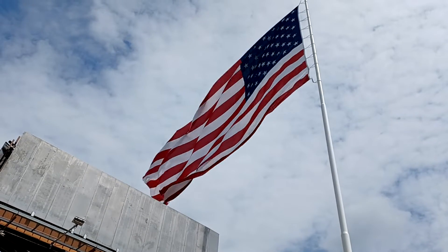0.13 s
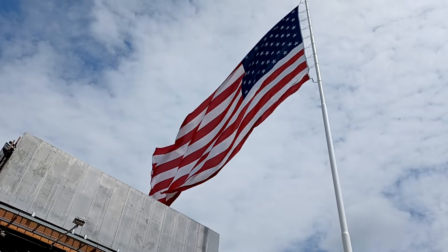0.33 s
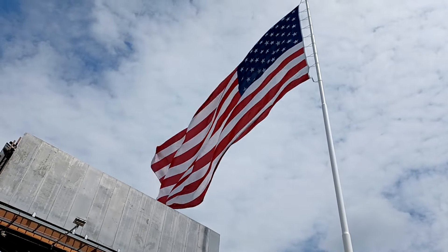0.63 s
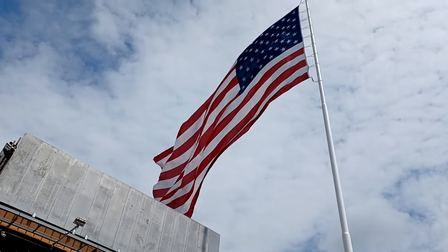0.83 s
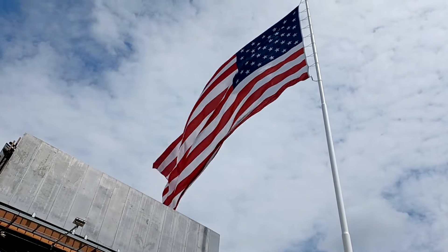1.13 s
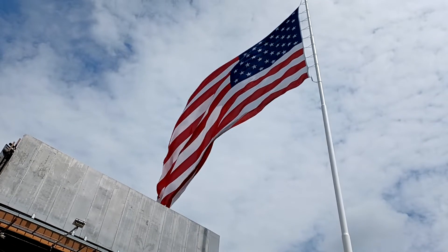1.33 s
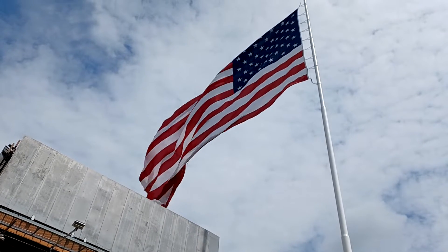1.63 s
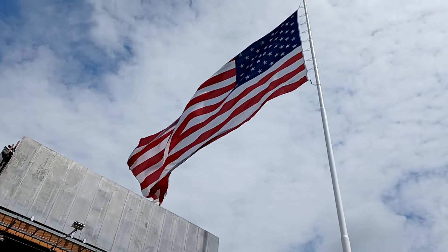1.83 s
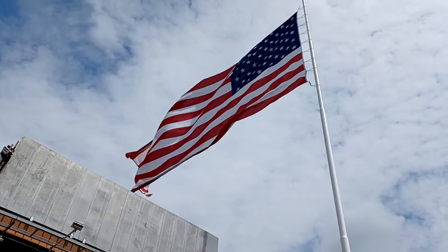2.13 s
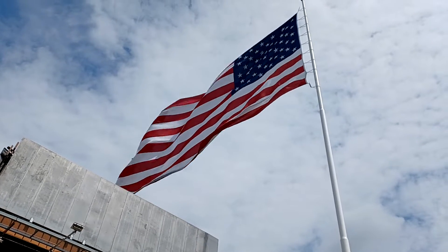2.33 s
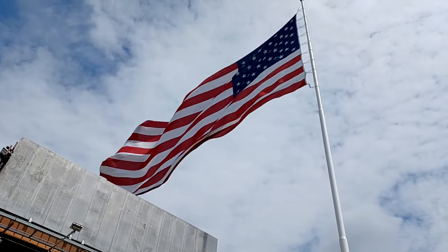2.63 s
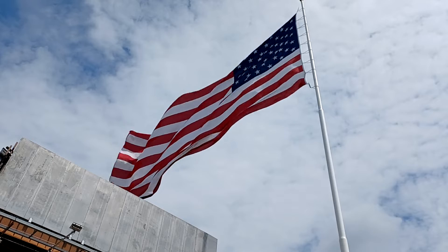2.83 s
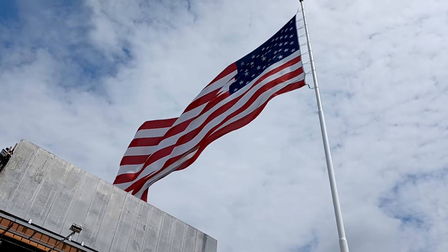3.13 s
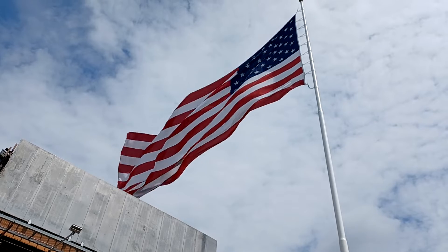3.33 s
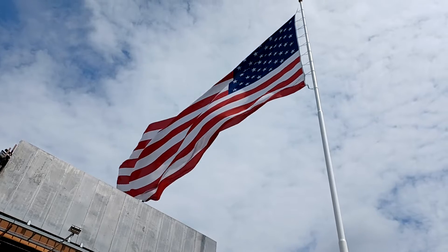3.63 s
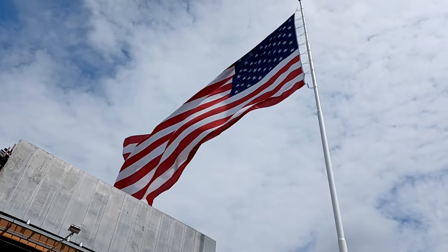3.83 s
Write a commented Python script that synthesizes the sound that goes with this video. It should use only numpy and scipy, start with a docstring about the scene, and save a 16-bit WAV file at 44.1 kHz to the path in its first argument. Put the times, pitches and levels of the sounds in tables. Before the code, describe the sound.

A big flag flapping on its pole, with dull cloth thuds and low wind rumble.

```python
"""A large flag flaps on its pole in a gusty wind that eases after two seconds and picks up again.
Each flap is a short dull burst of air, different at each ear; the cloth rustles, and cracks as it
pulls taut. Underneath, eddies rumble on the microphone in lumps over steady distant air.
The halyard fittings tick, and a small bird calls thinly far away."""
import sys
import numpy as np
from scipy import signal
from scipy.fft import rfft, irfft
from scipy.io import wavfile

SR = 44100
rng = np.random.default_rng(int(sys.argv[2]) if len(sys.argv) > 2 else 0)


def persist_wave(psi):
    """Save psi, clipped to +-1, as 16-bit WAV."""
    counts = np.round(np.clip(psi, -1, 1) * 32767).astype(np.int16)
    wavfile.write(sys.argv[1], SR, np.atleast_2d(counts).T)


N = 176400
TIME = np.arange(N) / SR
EVENT_SIZE = int(0.16 * SR)
EVENT_TIME = (np.arange(EVENT_SIZE) - EVENT_SIZE // 2) / SR   # zero at the middle of a short sound


def from_db(db):
    """Decibels to gain."""
    return 10 ** (np.asarray(db) / 20)


def rms_one(x):
    """Scale to an rms of 1."""
    return x / np.sqrt(np.mean(x ** 2) + 1e-20)


def fader(rows):
    """A gain that rides through (time [s], level [dB]) points."""
    return from_db(np.interp(TIME, *np.transpose(rows)))


def drift(rate_hz):
    """Smooth random motion with a spread of 1."""
    hop, settle = 40, 2000
    pole = np.exp(-2 * np.pi * rate_hz * hop / SR)
    white = rng.standard_normal(N // hop + settle + 2)
    slow = signal.lfilter([1], [1, -2 * pole, pole * pole], white)[settle:]
    return np.interp(np.arange(N) / hop, np.arange(len(slow)), rms_one(slow))


def coloured(x, spectrum, mid_db=0, bass_db=0):
    """EQ a sound to a spectrum, with an optional upper-mid lift and bass shelf."""
    size = x.shape[-1]
    hz = np.arange(size // 2 + 1) * SR / size
    points_hz, points_db = np.transpose(spectrum)
    curve_db = np.interp(np.log(hz + 1e-6), np.log(points_hz), points_db)
    mid = (1 - 1 / (1 + (hz / 745) ** 6)) / (1 + (hz / 1970) ** 4)
    bass = 1 / (1 + (hz / 190) ** 6)
    return irfft(rfft(x) * from_db(curve_db + mid_db * mid + bass_db * bass), size)


def noise(spectrum, grain_db=0):
    """Wide stereo noise with an optional fine flutter; rms 1."""
    flutter = from_db(grain_db * drift(42))
    return rms_one(coloured(flutter * rng.standard_normal((2, N)), spectrum))


def swell(rise_s, fall_s):
    """An exponential rise and fall."""
    return np.exp(-np.abs(EVENT_TIME) / np.where(EVENT_TIME < 0, rise_s, fall_s))


def burst(envelope, spectrum, mid_db=0, bass_db=0):
    """A puff of coloured noise, unrelated at the two ears, with the energy of 20 ms at rms 1."""
    puff = coloured(envelope * rng.standard_normal((2, len(envelope))), spectrum, mid_db, bass_db)
    return puff * np.sqrt(0.02 * SR / np.sum(puff ** 2, axis=1, keepdims=True))


def add(out, time_s, x):
    """Mix in a short sound, centred on time_s."""
    start = int(time_s * SR) - x.shape[-1] // 2
    a, b = max(start, 0), min(start + x.shape[-1], N)
    out[:, a:b] += x[..., a - start:b - start]


def air():
    """A steady, quiet bed of distant air."""
    # tone of the air: (frequency [Hz], level [dB])
    spectrum = [(20, 2), (100, 12.5), (300, -3), (700, -29.5), (1000, -10.5), (1600, -8), (2400, -22),
                (3600, -42.5), (5000, -32), (7500, -30.5), (9500, -43), (15500, -53)]
    return from_db(-47.5) * noise(spectrum)


def rumble():
    """Eddies hit the microphone in lumps, partly shared and partly separate at each ear."""
    # strength of the wind: (time [s], level [dB])
    gusts = [(0, -26.5), (.3, -24.5), (.45, -28.5), (.62, -29), (.72, -26), (.92, -24), (1.01, -28),
             (1.38, -28.5), (1.56, -33), (1.85, -25), (2.0, -35), (2.2, -34.5), (2.32, -40), (2.6, -34),
             (2.86, -40), (3.1, -36), (3.32, -30), (3.45, -28), (4.0, -30)]
    # tone of the buffeting: (frequency [Hz], level [dB])
    spectrum = [(20, -46.5), (40, -33.5), (65, -5), (105, 1.5), (180, -1), (260, 3), (400, -0.5), (560, -9),
                (800, -16.5), (1500, -33.5), (2600, -49), (5000, -67), (15000, -105.5)]
    lumps_db = 3 * drift(25.2) + 2 * np.array([drift(93), drift(81)])
    eddies = coloured(from_db(lumps_db) * rng.standard_normal((2, N)), spectrum)
    return fader(gusts) * rms_one(eddies)


def bird():
    """Thin, rough, gliding whistles, some stronger in their octave, blurred by the moving air."""
    # calls: (time [s], length [s], pitch [Hz], glide [Hz], level [dB], octave level [dB])
    notes = [(1.89, 0.04, 6170, -150, -72, -78), (2.135, .03, 6350, -200, -72, -77),
             (2.672, 0.056, 6040, -200, -72, -67), (3.126, 0.075, 6650, -150, -73, -86),
             (3.207, .04, 6170, 248, -59.5, -73), (3.254, .045, 6500, -500, -67, -68.5),
             (3.395, .03, 6050, 197, -83, -74)]
    out = np.zeros((2, N))
    waver_hz = 126.4 * np.array([drift(162), drift(150)])
    for time_s, length_s, hz, glide_hz, db, octave_db in notes:
        progress = np.clip((TIME - time_s) / length_s, 0, 1)
        phase = 2 * np.pi * np.cumsum(hz + glide_hz * progress + waver_hz, axis=1) / SR
        arch = 2 * np.sqrt(progress * (1 - progress))
        out += arch * (from_db(db) * np.sin(phase) + from_db(octave_db) * np.sin(2 * phase))
    flutter_db = 3 * drift(120)
    return out * from_db(flutter_db)


def contact(spectrum):
    """A hard contact: a sharp click a little to the left, then a faint crackling tail."""
    rise_s, max_lag_s = 0.00024, 0.00019
    left = burst(swell(rise_s, fall_s=0.00062), spectrum)[0]
    right = np.roll(left, int(rng.uniform(0, max_lag_s) * SR))
    crackle = from_db(4.5 * drift(120)[:EVENT_SIZE])
    tail = burst(crackle * swell(rise_s, fall_s=0.023), spectrum)
    return np.array([left, right]) + from_db(-13.5) * tail


def halyard_ticks():
    """The halyard fittings knock, each tick with a bright body and a fine top."""
    # knocks: (time [s], relative body level [dB], relative top level [dB])
    hits = [(0.7048, -44.5, -57), (0.8916, -44, -53), (1.3055, -54, -57), (1.3105, -39.5, -41.5),
            (1.3603, -53, -55), (1.4356, -54.5, -59), (1.6518, -53, -58), (1.72, -57, -64),
            (2.0853, -59, -61), (2.169, -47, -66), (2.36, -60, -71), (2.6122, -60, -60),
            (2.7765, -31.5, -54), (2.993, -47, -66), (3.0367, -56, -61), (3.4736, -42, -75),
            (3.494, -40, -60), (3.6035, -53, -58), (3.985, -51.5, -79)]
    # tone of a tick's body: (frequency [Hz], level [dB])
    body_spectrum = [(20, -26), (900, -11), (2300, 3), (3300, -15), (4400, 1.5), (4900, -0.5), (5750, 4),
                     (6700, -8.5), (15500, -32.5)]
    # tone of its top: (frequency [Hz], level [dB])
    top_spectrum = [(20, -78), (5000, -30), (8500, -6.5), (10800, -3), (13000, -6), (17000, -1)]
    out = np.zeros((2, N))
    for time_s, body_db, top_db in hits:
        body = from_db(body_db - 12) * contact(body_spectrum)
        top = from_db(top_db - 2) * contact(top_spectrum)
        add(out, time_s + 0.0015, body + top)
    return out


def cloth_rustle():
    """Cloth slides over cloth and swishes in the strong gusts, with a thin hiss on top."""
    # rides of the rustle, swish and hiss: (time [s], relative level [dB])
    rustle_ride = [(0.03, -59), (0.15, -63), (0.45, -68), (0.7, -62), (1.05, -65.5), (2.2, -72),
                   (3.15, -67), (3.55, -61.5), (4.0, -64.5)]
    swish_ride = [(.08, -63.5), (.72, -67.5), (1.3, -74), (1.6, -86), (3.2, -99), (3.7, -85)]
    hiss_ride = [(.14, -66), (.27, -81.5), (.75, -75), (.95, -63), (1.17, -71), (1.3, -71), (1.32, -54),
                 (1.39, -58.5), (1.5, -68.5), (1.95, -87), (2.1, -67), (2.35, -81), (2.63, -66), (2.8, -64),
                 (2.9, -86), (3.4, -73), (3.6, -63), (3.7, -78)]
    # their tones: (frequency [Hz], level [dB])
    rustle_spectrum = [(20, -26), (800, -6), (1700, 13), (2500, 5.5), (3600, -7), (5000, -2), (7000, -7.5),
                       (9000, -12.5), (15500, -15.5)]
    swish_spectrum = [(500, -38.5), (2400, 1.5), (3500, 6), (5000, -6.5), (9000, -29.5)]
    hiss_spectrum = [(20, -39.5), (4000, -1.5), (8000, -5.5), (10500, -7), (13000, 1.5), (15500, -5.5)]
    rustle = fader(rustle_ride) * noise(rustle_spectrum, grain_db=2)
    swish = fader(swish_ride) * noise(swish_spectrum, grain_db=2)
    hiss = fader(hiss_ride) * noise(hiss_spectrum, grain_db=2.5)
    return from_db(5.5) * rustle + swish + from_db(-4) * hiss


def cloth_snaps():
    """The cloth pulls taut in one pressure pulse: a thud when low, a short dry crack when high."""
    # snaps: (time [s], relative peak [dB], pan to the left [dB], pitch [Hz])
    snaps = [(.072, -17, 5, 586), (0.112, -11, -3, 300), (0.246, -14, 10, 467), (.395, -18, 5, 257),
             (0.7075, -32, 0, 2000), (0.785, -11.5, -9, 330), (.871, -5, -10, 370), (1.308, -26, 3, 1530),
             (1.31, -38, -2, 2030), (1.46, -9, -2, 290), (1.476, -15.5, 12, 530), (1.669, -10.5, -9, 367),
             (1.786, -31, -9, 1290), (1.896, -8.5, -5, 298), (2.625, -18, 2, 360), (2.775, -26, -1, 910),
             (2.7775, -33, 0, 1880), (2.8162, -21, -2, 443), (3.248, -7.5, -2.5, 340),
             (3.4952, -13, 0, 1110)]
    sides = np.array([[0.5], [-0.5]])
    ear_turn_rad = 0.99   # this phase gap gives each ear its own pulse shape
    out = np.zeros((2, N))
    for time_s, db, pan_db, hz in snaps:
        angle = np.pi * hz * EVENT_TIME
        pulse = signal.hilbert((1 - 2 * angle ** 2) * np.exp(-angle ** 2))
        turn = np.exp(1j * (2 * np.pi * rng.random() + ear_turn_rad * sides))
        add(out, time_s, from_db(db - 5.5 + pan_db * sides) * np.real(turn * pulse))
    return out


def flag_flaps():
    """Each flap pushes out a brief puff of air; big folds roll longer and deeper than small ones."""
    # flaps: (time [s], relative level [dB], brightness [dB])
    flaps = [(0.021, -20, -9.5), (0.073, -26.5, -5.5), (0.083, -27.5, 1), (0.113, -17.5, -15),
             (0.193, -23.5, -3.5), (0.227, -19, -17), (0.248, -14.5, -3.5), (0.273, -20.5, -32),
             (0.288, -28, -9.5), (0.347, -20, -16.5), (0.395, -21, -14.5), (0.471, -30.5, -15),
             (0.505, -21.5, -13.5), (0.661, -20, -18), (0.707, -18, -15.5), (0.72, -20, -11),
             (0.749, -18, -20), (0.786, -28.5, -5.5), (0.834, -25.5, -7), (0.841, -18.5, -19),
             (0.871, -19, -10), (0.885, -26.5, -1), (0.929, -26.5, -21), (0.953, -20, -16.5),
             (1.03, -28, -5), (1.067, -21.5, -21), (1.081, -23.5, -14), (1.135, -19, -25.5),
             (1.274, -28.5, -12), (1.347, -31, -38), (1.434, -23.5, -19), (1.46, -32, -12),
             (1.475, -18.5, -19), (1.497, -24, -13.5), (1.669, -22, -11), (1.707, -21, -16),
             (1.727, -21.5, -10), (1.786, -28.5, -6), (1.812, -30, -17), (1.85, -29, -27),
             (1.869, -25.5, -38), (1.899, -23, -12), (1.939, -23.5, -27), (1.968, -27.5, -24),
             (2.04, -31.5, -19), (2.066, -26, -27), (2.13, -30.5, -53), (2.182, -30.5, -11.5),
             (2.211, -27.5, -18), (2.437, -26, -43), (2.562, -28.5, -32), (2.626, -23, -15),
             (3.249, -18.5, -19.5), (3.29, -21, -25), (3.312, -21, -32), (3.33, -21, -28),
             (3.428, -23, -15), (3.531, -26.5, -24), (3.633, -26.5, -18), (3.678, -22, -34),
             (3.757, -24.5, -37), (3.772, -23, -23), (3.87, -24, -21), (3.906, -20.5, -19),
             (3.975, -17.5, -21)]
    # tone of a flap: (frequency [Hz], level [dB])
    spectrum = [(25, -14.5), (60, -10.5), (110, -1), (190, -2.5), (280, 2), (410, 0.5), (560, -8.5),
                (800, -21), (1500, -34.5), (2600, -51.5), (5000, -82), (15000, -90.5)]
    out = np.zeros((2, N))
    for time_s, db, bright_db in flaps:
        dull_db = -15.5 - bright_db   # above zero for the big folds
        stretch = 2 ** (dull_db / 36.5)
        envelope = swell(rise_s=0.0054 * stretch, fall_s=0.0085 * stretch)
        puff = burst(envelope, spectrum, mid_db=16 + bright_db, bass_db=0.6 * dull_db)
        add(out, time_s, from_db(db - 1.5) * puff)
    return out


def scene():
    """Flag, wind, fittings and bird in the open air."""
    return flag_flaps() + cloth_snaps() + rumble() + cloth_rustle() + halyard_ticks() + bird() + air()


def record(dry):
    """A steep low-pass cuts the very top."""
    cutoff_hz = 15900
    return signal.sosfilt(signal.ellip(10, 0.1, 80, cutoff_hz, fs=SR, output="sos"), dry)


dry = scene()
out = record(dry)
persist_wave(out)
```